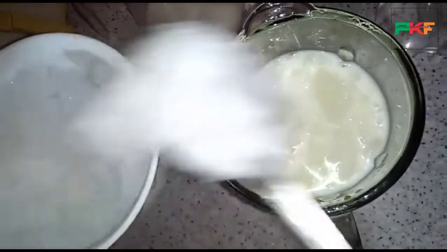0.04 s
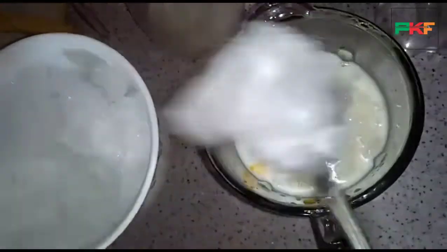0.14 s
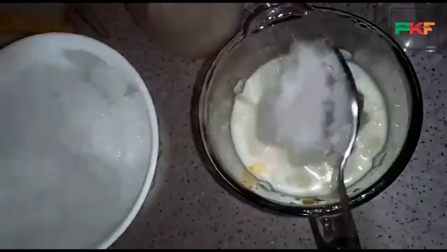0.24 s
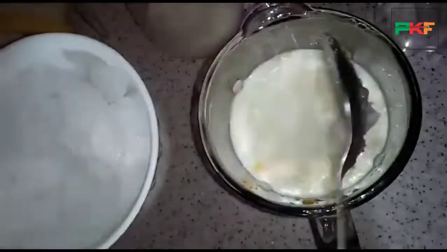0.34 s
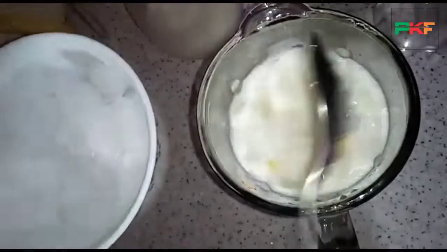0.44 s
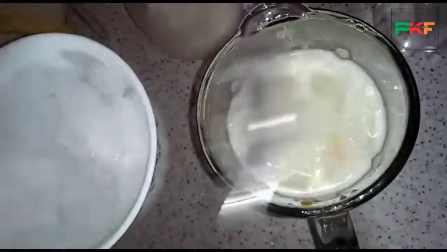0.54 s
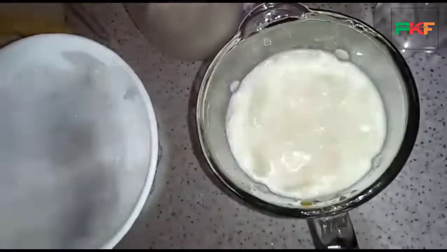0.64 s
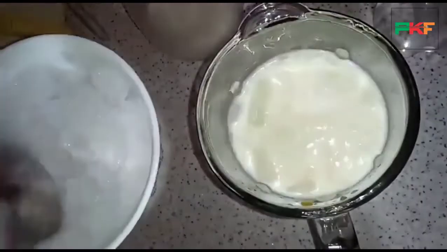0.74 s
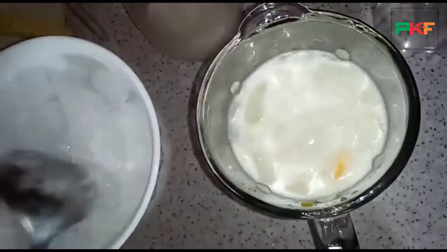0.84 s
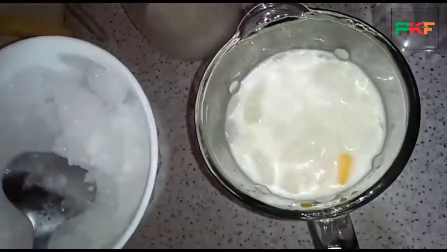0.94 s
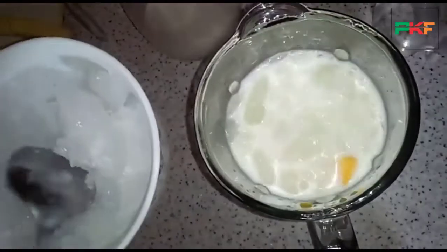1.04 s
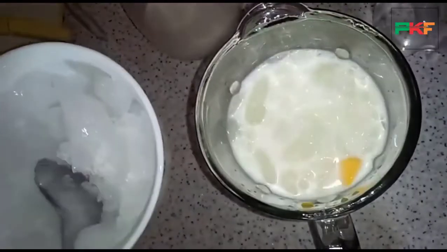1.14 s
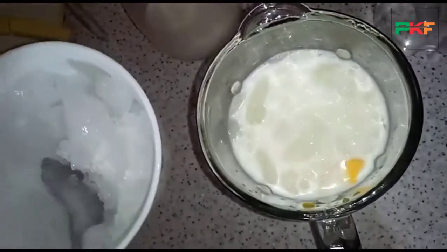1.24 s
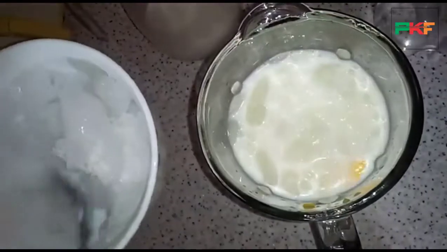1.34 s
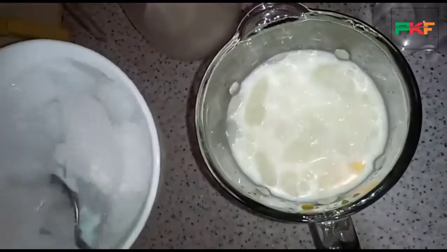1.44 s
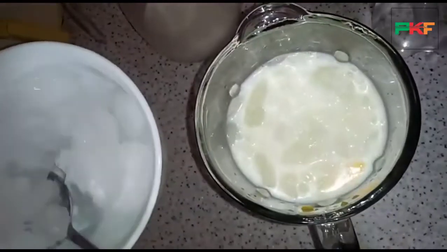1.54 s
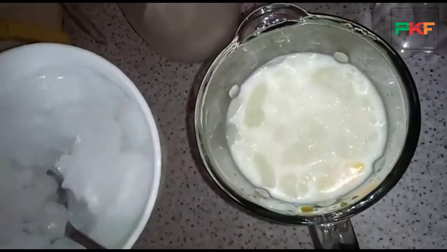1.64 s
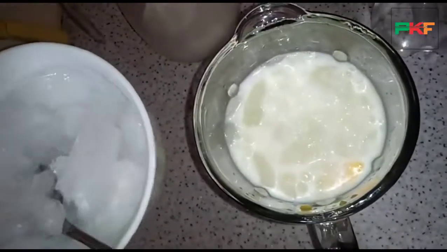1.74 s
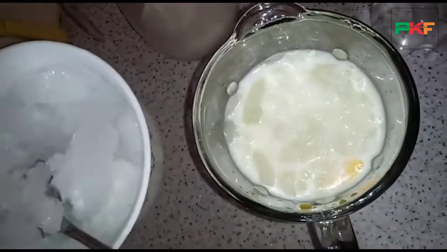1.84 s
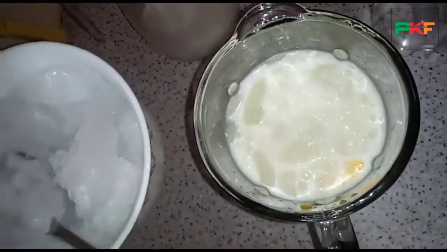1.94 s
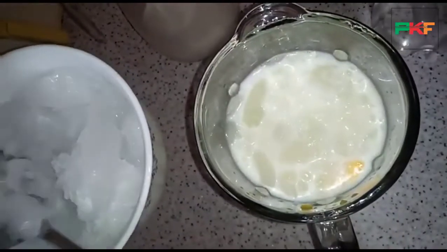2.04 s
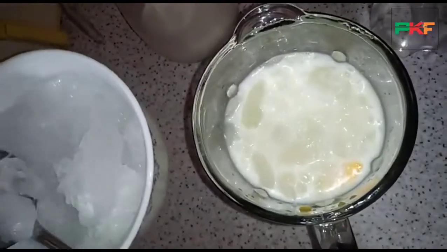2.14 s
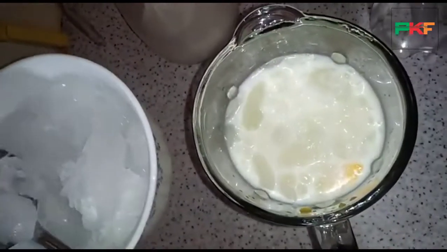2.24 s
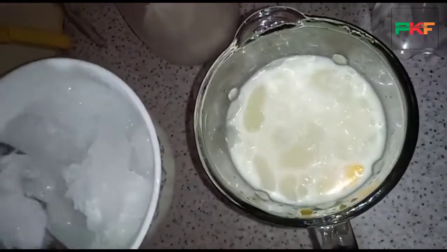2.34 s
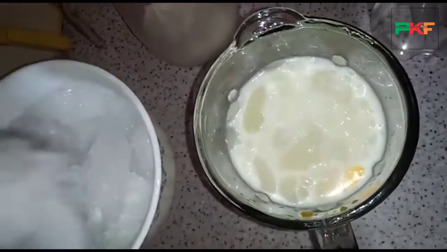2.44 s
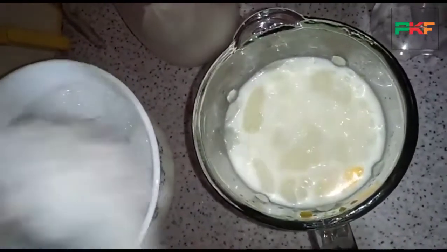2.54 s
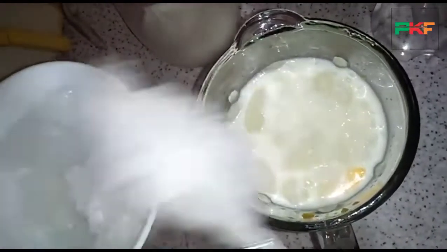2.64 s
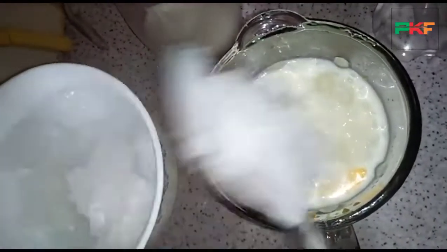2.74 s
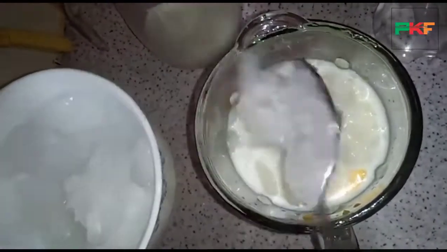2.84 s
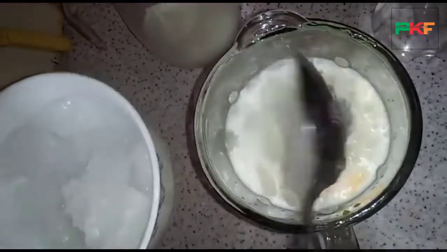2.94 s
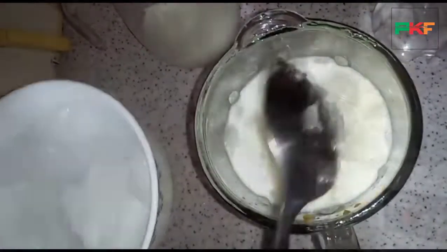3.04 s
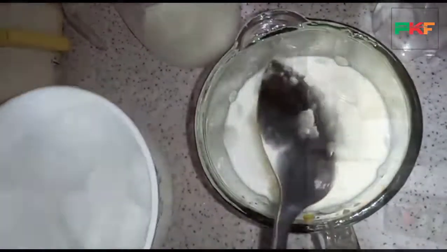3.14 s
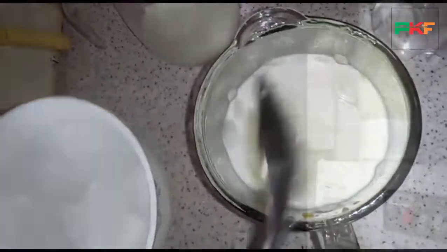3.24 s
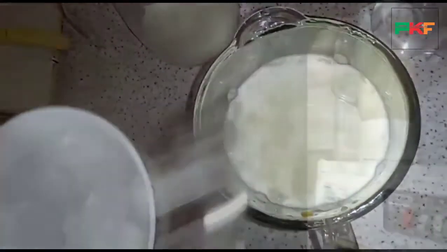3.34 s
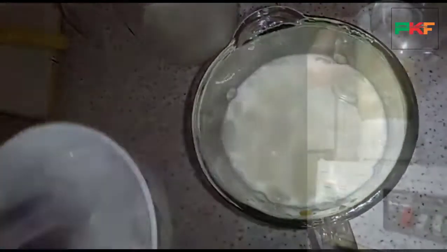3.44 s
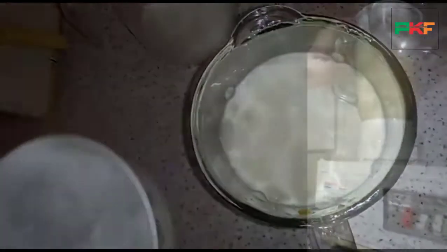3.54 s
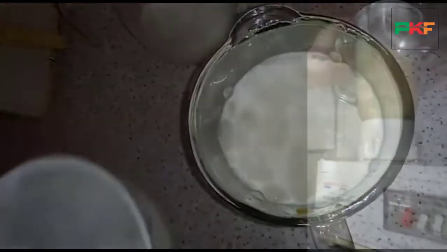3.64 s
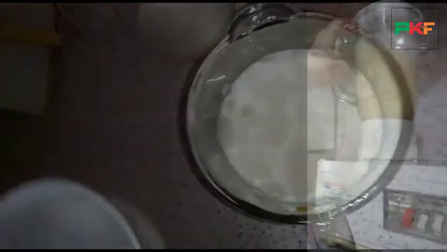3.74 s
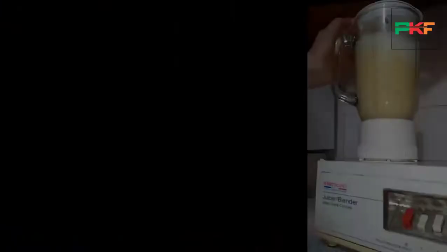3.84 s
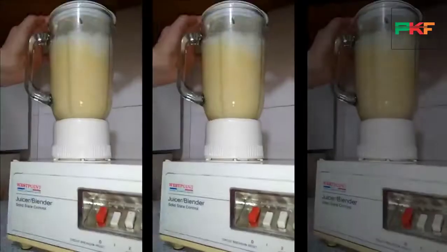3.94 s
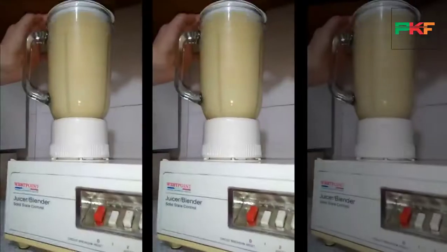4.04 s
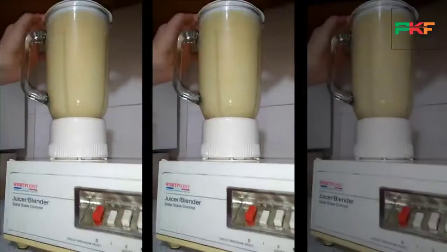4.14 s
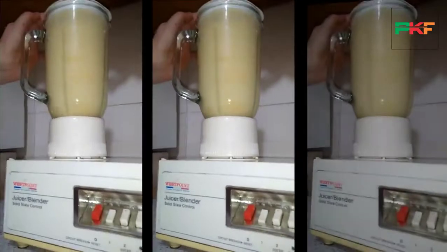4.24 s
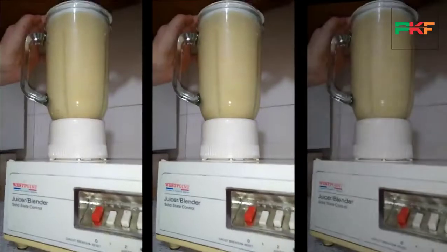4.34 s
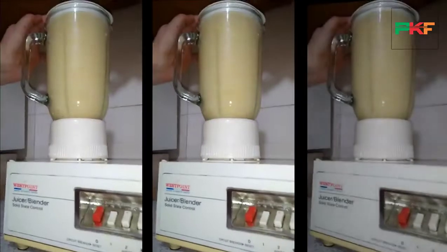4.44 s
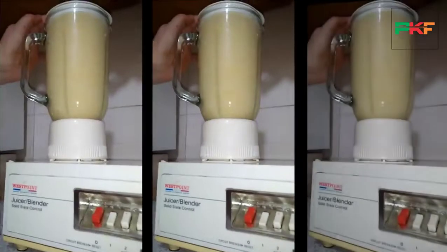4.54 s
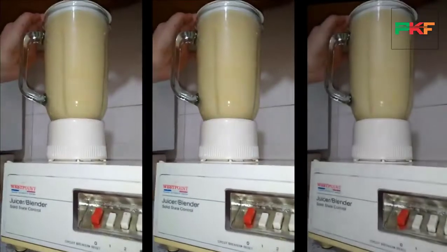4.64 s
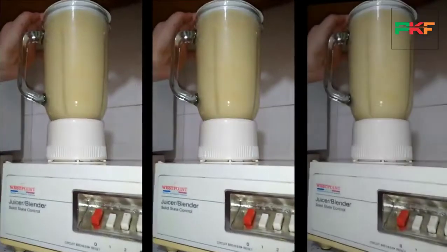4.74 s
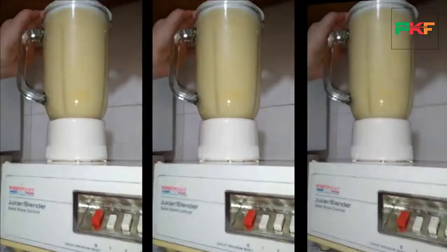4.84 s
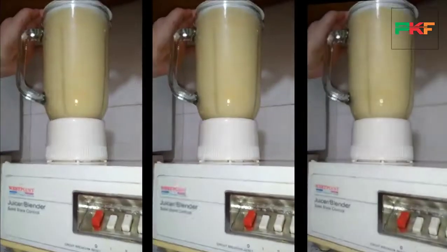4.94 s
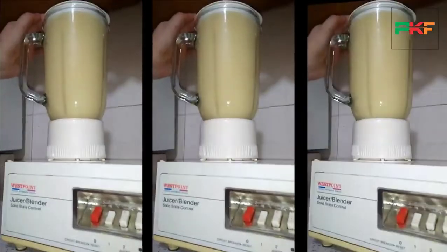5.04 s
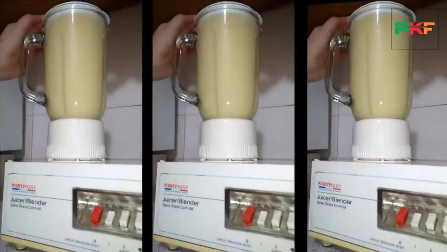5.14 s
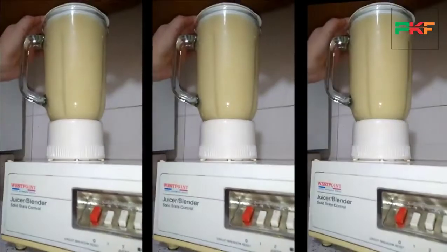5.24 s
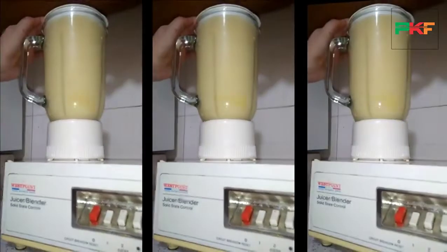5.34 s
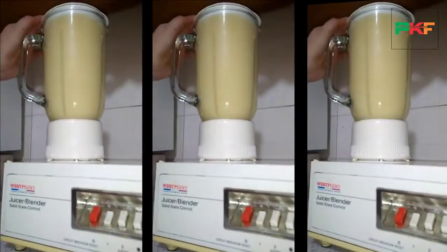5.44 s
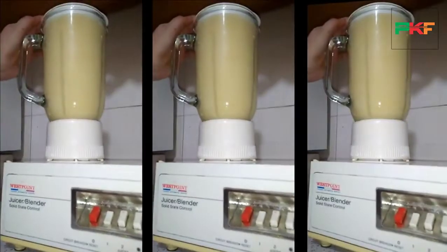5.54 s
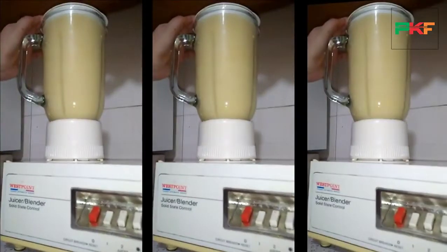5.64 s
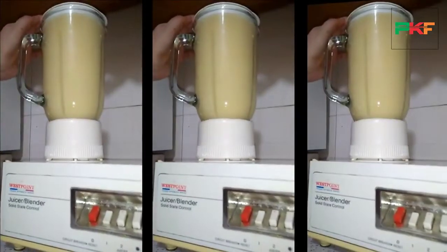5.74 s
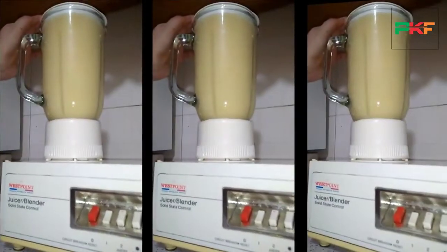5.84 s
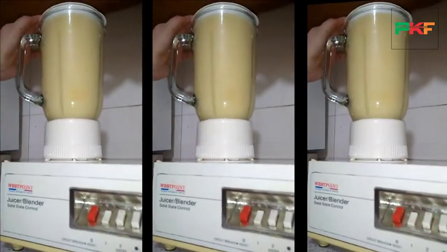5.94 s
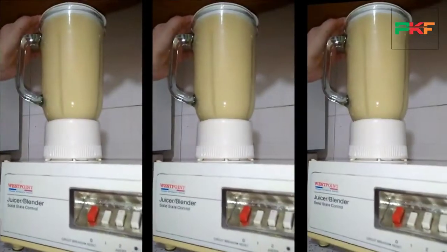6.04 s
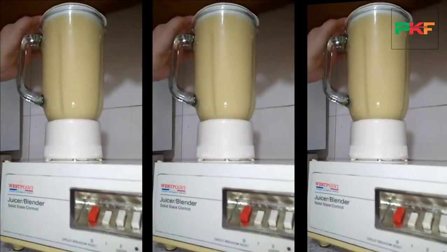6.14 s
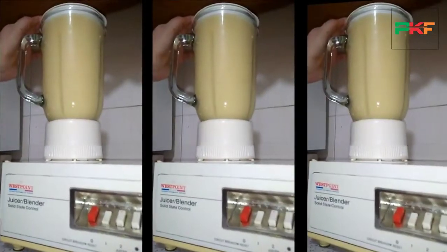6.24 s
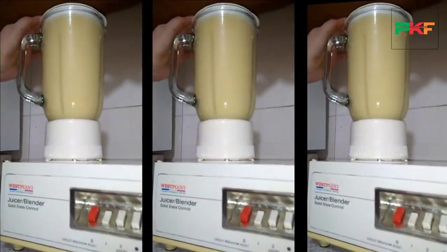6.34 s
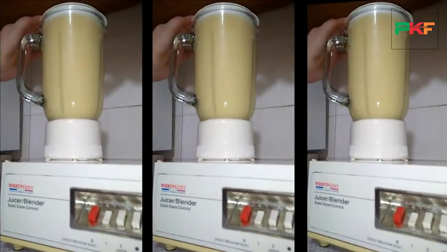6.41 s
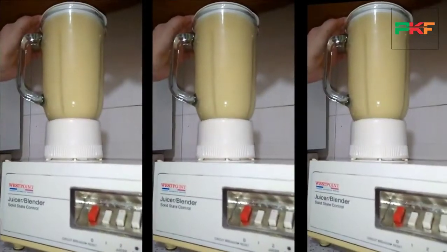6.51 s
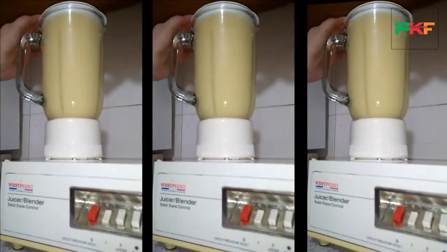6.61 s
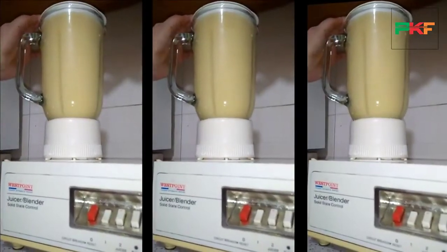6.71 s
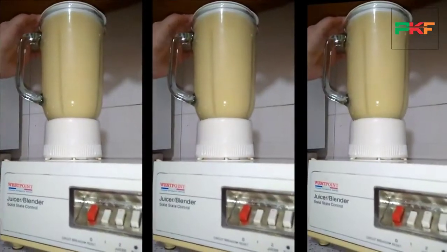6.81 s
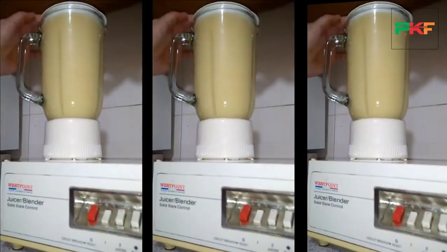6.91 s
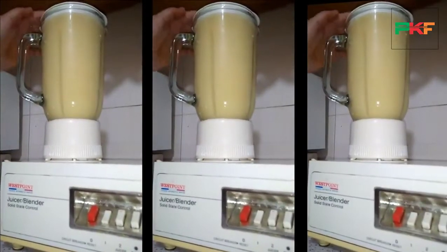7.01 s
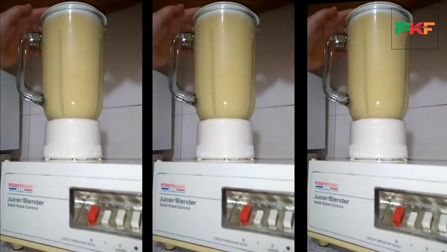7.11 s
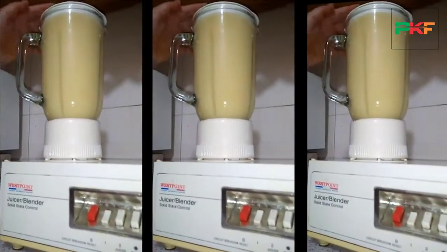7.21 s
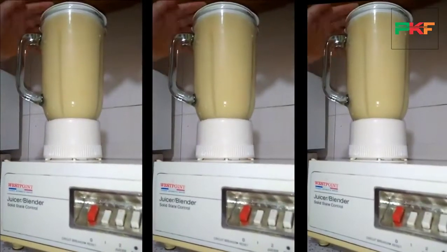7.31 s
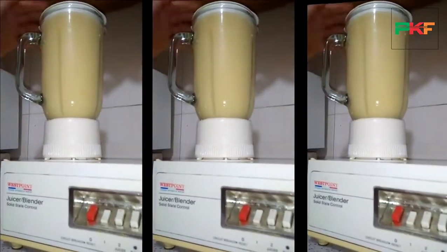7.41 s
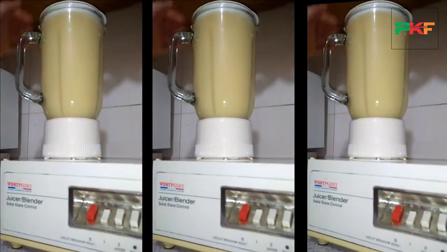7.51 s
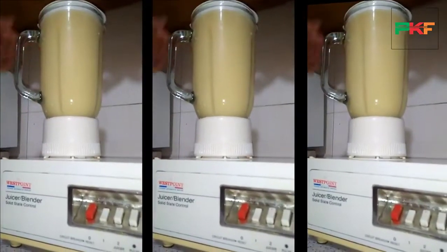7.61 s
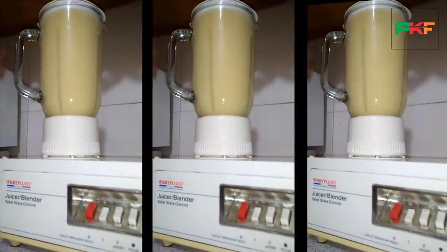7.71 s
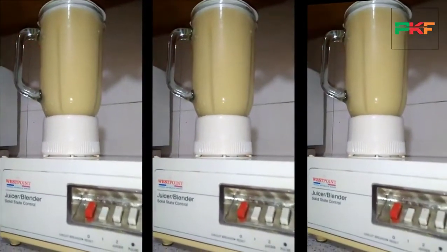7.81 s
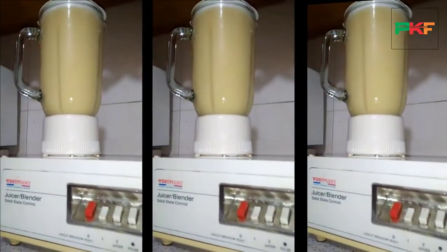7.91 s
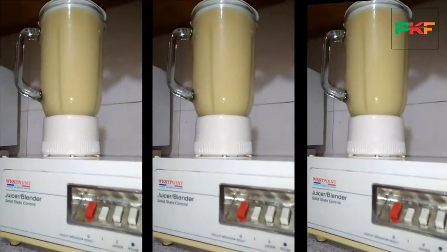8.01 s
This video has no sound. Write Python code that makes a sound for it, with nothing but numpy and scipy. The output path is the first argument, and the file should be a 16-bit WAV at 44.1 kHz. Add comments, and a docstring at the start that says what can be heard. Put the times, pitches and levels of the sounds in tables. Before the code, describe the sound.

Ice patters and cracks into a milk-filled jar, then a metal spoon digs through crushed ice, scraping and clanking hard against the tub. It quiets to small scrapes before a second splashy drop. Silence follows, then a loud blender runs abruptly, its ice knocks thinning as slush churns. Close, slightly overloaded microphone, short kitchen echo.

```python
"""A spoon scrapes and knocks in a tub of crushed ice, and ice tips twice into the milk in a glass jar:
random clicks and single blows set tub, spoon and jar ringing, over a faint rumble, air noise and hiss.
After a short silence a blender is already running: a wandering tone is the motor's hum, and swelling click
noise is ice knocking on the jar and slush surging. Both parts have a short kitchen echo, and the close
microphone flattens the loudest knocks."""
import sys
import numpy as np
from scipy import signal
from scipy.fft import rfft, irfft, next_fast_len
from scipy.io import wavfile

SR = 44100
rng = np.random.default_rng(int(sys.argv[2]) if len(sys.argv) > 2 else 0)


def convert_level_to_amplitude(level_db):
    """Map a level in decibels to its linear amplitude factor."""
    exponent = np.asarray(level_db, float) / 20
    return 10 ** exponent


def transcribe(u):
    """Save the signal u as a 16-bit wav file named by the first command-line argument.

    u: samples, shape (n,) or (channels, n), limited to [-1, 1]; the rate is SR.
    q: integer samples, one column per channel.
    """
    v = np.clip(np.atleast_2d(u).T, -1, 1)
    q = np.round(v * 32767).astype(np.int16)
    wavfile.write(sys.argv[1], SR, q)


N = 355887  # length [samples]
CUT_S, START_S = 3.945, 4.668  # the spoon part ends, the blender part starts

# Levels in the tables are settings for the mix; spectra and resonances give relative levels.
# motor: (time [s], shaft turns [Hz], hum [dB])
MOTOR = [(4.67, 115, -53.5), (5.3, 118, -43.5), (5.9, 123.3, -42), (6.9, 126.2, -41), (8.07, 125.5, -39)]
# large chunks ground by the blades: (centre [s], knock [dB], crunch above knock [dB], reach [s])
# blender() keeps each reach between 0.003 and 0.06 s
CHUNKS = [(4.945, -26, 12, 0.0054), (4.992, -7, -11, .012), (5.037, -17.5, -1, .012), (5.112, -22, 6, .007),
          (5.131, -22.5, 6.5, .012), (5.26, -9, -5.5, 0.011), (5.351, -16.5, 3.5, .015),
          (5.566, -19, -23, .017), (5.631, -14.5, -3.5, 0.01), (5.772, -23.5, 15, 0.0038),
          (5.811, -14, -6.5, 0.0049), (5.884, -9, -2, 0.013), (5.968, -19.5, -16, 0.014),
          (6.068, -14, -12.5, 0.031), (6.162, -13, -7.5, 0.015), (6.244, -14, 6, .004),
          (6.27, -18.5, -4, 0.0089), (6.335, -15.5, 2.5, .008), (6.465, -25.5, -6.5, .02),
          (6.771, -16, 5.5, .007), (7.192, -33, 6, 0.0017), (7.227, -26.5, 18, .01),
          (7.302, -25.5, 10, .01), (7.544, -16, 4, .007)]
# the slush folds over and surges through the blades:
# (centre [s], width [s], surge [dB], crunch above surge [dB], base ring [dB]); surging() scales the width
SURGES = [(4.718, 0.09, -16, -2.5, -24.5), (4.89, 0.17, -8, 8.5, -20), (5.044, .2, 9.5, -1.5, -23.5),
          (5.263, 0.14, 8, -0.5, -43), (5.388, 0.11, 13.5, -0.5, -24), (5.531, 0.066, 1.5, -0.5, -28),
          (5.646, 0.11, 7.5, -12, -33), (5.892, 0.13, 3, -0.5, -27.5), (6.073, 0.21, 4, -5, -20),
          (6.29, 0.23, 3.5, 0, -29.5), (6.46, 0.17, 7, -0.5, -23.5), (6.645, 0.058, 4, 7.5, -24.5),
          (6.764, 0.14, 9, 2.5, -29.5), (6.949, .1, 10.5, 1, -21.5), (7.209, 0.2, 4, 0.5, -19),
          (7.501, 0.26, 2.5, 0, -21), (7.761, .15, 10, -4.5, -21), (7.956, 0.12, 6.5, -7, -24.5),
          (8.06, 0.073, -6, -11.5, -17.5)]
# resonances of jar and housing: (frequency [Hz], width [Hz], level [dB])
HOUSING = [(1050, 33, -2.5), (1361.5, 27, -3), (1598, 200, -6), (1854, 98, -1), (1965, 14, -12),
           (2100, 200, -2.5), (2420, 120, -9.5), (2570, 170, -9)]
# resonances of the glass: (frequency [Hz], width [Hz], level [dB])
GLASS = [(4700, 450, 10), (6420, 240, 20), (8130, 370, 2.5), (8680, 80, -8.5), (8740, 190, -22),
         (11400, 800, -18)]
# hollows in the slush: (frequency [Hz], width [Hz], level [dB])
SLOSH = [(163.4, 14, -4.5), (303, 110, -2.5), (294, 12, -7.5), (451.5, 25, -2), (545.5, 100, -5.5),
         (598, 68, 3)]
# spectrum of the broad noise under the blender's rings: (frequency [Hz], level per Hz [dB])
WASH = [(15, -70), (25, -70.5), (120, 1), (290, -12), (368, -18), (610, -8.5), (840, -9), (1040, 7),
        (1250, -31), (1770, 16.5), (3540, -31.5), (5710, -21.5), (6350, -14.5), (8740, -7.5), (14500, -20)]
# ring of the blender's base: (frequency [Hz], width [Hz], level [dB])
BASE_RING = [(1056, 53.6, -3.5), (1098, 82, -13)]
# spoon knocks in the tub: (time [s], blow [dB], spoon above tub [dB], crack [dB], crush length [s])
# tub() keeps each crush length between 0.004 and 0.3 s
KNOCKS = [(0.903, -59.5, -8, -85, .02), (0.985, -61, -9, -80, .02), (1.134, -58, -5, -57, 0.026),
          (1.214, -42.5, -5, -53.5, .05), (1.289, -46, -30, -79.5, 0.42), (1.342, -32.5, -17, -28, 0.021),
          (1.376, -35, -23, -54, 0.026), (1.384, -6, -51, -23, 0.07), (1.551, -27, -35, -67, 0.034),
          (1.558, -24.5, -18, -25.5, 0.026), (1.593, -20, 30, -22, 0.039), (1.63, -6, 49, -16, 0.071),
          (1.64, -16.5, -2, -21, 0.033), (1.837, -24, 19, -38, 0.051), (2.09, -50, -32, -84, 0.037),
          (2.288, -51, -4, -50, 0.16), (2.345, -48, 6, -49, 0.082), (2.522, -54.5, -2, -48, 0.1),
          (2.572, -63, -10.5, -68, 0.05), (2.76, -64, -16, -64.5, 0.048)]
# strokes of the spoon through the ice:
# (start [s], length [s], scrape [dB], crystal hiss above scrape [dB])
STROKES = [(.96, .08, -65, 1.5), (1.114, 0.21, -44, -13), (1.295, 0.31, -27, -12.5), (1.55, 0.51, -31, -12),
           (1.952, 0.047, -61, 3), (2.074, 0.072, -46.5, -13.5), (2.15, 0.078, -47.5, -2.5),
           (2.329, 0.056, -43, -7), (2.505, 0.064, -54, -9.5), (2.6, .1, -74.5, -14)]
# ringing tones of the tub: (frequency [Hz], level [dB], time to fade by 60 dB [s])
TUB = [(507, -19, 0.12), (900, -4, .04), (994, 6.5, 0.03), (1200, -8, 0.076), (1504, -14, 0.14),
       (3160, -14, 0.069), (3270, -6.5, 0.037), (4840, -12, 0.029), (5430, -3, 0.06), (10100, -19, .06)]
# ringing tones of the spoon: (frequency [Hz], level [dB], time to fade by 60 dB [s])
SPOON = [(1540, -3.5, .12), (2028, 5.5, 0.14), (2098, 3.5, 0.076), (2430, -9, 0.14), (2550, -14, 0.031),
         (3520, -18, 0.44), (3680, -6, 0.17), (5480, -17.5, 0.36), (5590, -12, .15), (6358, -13.5, 0.073),
         (9700, -23.5, .2)]
# ice sliding off the spoon into the jar: (start [s], length [s], jar [dB], fizz above jar [dB])
SLIDES = [(0.443, .04, -71.5, 16), (0.481, 0.043, -36.5, 3.5), (0.537, 0.043, -29, 3), (.61, 0.11, -54, 10),
          (3.09, 0.036, -75, 15.5), (3.13, 0.07, -24.5, -1.5), (3.233, 0.029, -32, 3),
          (3.29, 0.06, -66, 12), (3.422, .03, -66, -15), (3.568, 0.031, -55.5, 8)]
# lumps landing in the jar: (time [s], note [Hz], note [dB], crack [dB], plop [dB])
LUMPS = [(0.488, 900, -27, -51, -48), (0.4946, 948, -8.5, -11, -27.5), (0.518, 1140, -20, -39, -30),
         (0.533, 1140, -25, -29, -61), (0.607, 1200, -55, -33, -73), (0.669, 1200, -31.5, -26, -70),
         (0.727, 1200, -39.5, -51, -53), (3.138, 1200, -28, -23.5, -37.5), (3.1463, 1376, -11, -14.5, -45),
         (3.235, 1140, -24, -28.5, -49.5), (3.238, 965, -21, -31.5, -53), (3.255, 1200, -38.5, -31, -57),
         (3.2609, 1050, -25.5, -40, -52), (3.34, 2320, -40.5, -57.5, -70), (3.424, 1260, -44.5, -67.5, -68)]
# resonances of the air in the jar: (frequency [Hz], width [Hz], level [dB])
JAR_AIR = [(920, 330, -7), (1240, 270, -3), (1835, 490, -14), (2270, 83, -1)]
# spectrum of the fizzing ice: (frequency [Hz], level per Hz [dB])
FIZZ = [(1650, -16), (2800, -9), (3590, -12.5), (4000, -6), (7290, -1.5), (9400, -3), (13400, -7.5),
        (14500, -0.5)]
# a faint thin tone flickers near the jar: (start [s], length [s], level [dB])
SETTLES = [(0.429, .72, -67.5), (3.56, .1, -73)]
# the hand shifts the tub, dull bumps: (centre [s], reach [s], level [dB])
BUMPS = [(.2, 0.15, -59), (0.548, 0.13, -53), (0.794, 0.08, -64), (1.062, 0.14, -55), (1.3, 0.19, -66),
         (1.68, .3, -59.5), (2.619, 0.11, -58.5), (2.79, .06, -60), (3.24, .2, -60.5), (3.5, .12, -65)]
# spectrum of the low rumble: (frequency [Hz], level per Hz [dB])
RUMBLE = [(15, -32.5), (25, -10), (43, 0.5), (102, 4), (124, -4.5), (250, -24.5), (320, -47), (550, -120)]
# spectrum of the air noise: (frequency [Hz], level per Hz [dB])
AIR = [(120, -39), (200, -8.5), (437, -4), (670, -12.5), (732, -3), (922, -7), (1780, -13), (2500, -20),
       (14000, -48)]

# Blender base settings, before the surge factor
KNOCK_DB, CRUNCH_DB, SLOSH_DB = -20, -26, -37
RING_DB = -31  # base ring between surges
KNOCK_FADE_DB_PER_S, CRUNCH_FADE_DB_PER_S = 4.5, 1.04  # the ice gets finer
SLOSH_FOLLOWS = 0.88  # power of the surge factor that the slosh takes
GURGLE, GURGLES_PER_S = .025, 6  # the hollows in the slush change size: share of pitch, pace
STROKE_ATTACK_S, STROKE_SAG_DB_PER_S, STROKE_RELEASE_DB_PER_S = 0.021, 29.5, 202
TUB_RUB_DB, SPOON_RUB_DB, CRUSH_DB = 22, 22.5, 1  # grit fed to tub, spoon and air, above the blow
NICKS_PER_S, NICK_DB = 180, 0.5  # the spoon's edge catches on lumps
RING_WAVER = .007  # ice against the walls unsettles the pitch of the rings: share of pitch
SLIDE_ATTACK_S, SLIDE_SAG_DB_PER_S = .003, 90
JAR_RELEASE_DB_PER_S, FIZZ_RELEASE_DB_PER_S = 350, 450
SETTLE_HZ, SETTLE_WIDTH_HZ = 2250, 55
RUMBLE_DB, AIR_DB, HISS_DB = -75, -69.5, -79  # still kitchen; the hiss is the microphone's
AIR_FOLLOWS = 0.083  # share of a bump's swing in dB that the air noise takes


def blender():
    """Ice bits rattle on blades and glass in quick clumps; each surge and large chunk swells the same rattle."""
    surge_db, bright_db = np.transpose(SURGES)[2:4]
    chunk_s, chunk_db, chunk_bright_db, reach = np.transpose(CHUNKS)
    reach = np.clip(reach, .003, .06)
    running_s = np.maximum(np.arange(N) / SR - START_S, 0)

    clumps = convert_level_to_amplitude(1.2 * drift(20) + 1.5 * drift(60))
    rattle = grains(5000, 3.0) * clumps
    spray = grains(8000, 3.0) * clumps * convert_level_to_amplitude(1.0 * drift(20))
    churn = grains(3000, 2.5)

    # Each layer is a ringing part plus a broad noisy part
    housing = resonances(rattle, HOUSING, flutter_db=2.5)
    knock = rms_one(housing) + 0.55 * rms_one(band(coloured(rattle, WASH), 800, 5100))
    glass = resonances(spray, GLASS, flutter_db=2.0)
    crunch = 0.57 * rms_one(glass) + 0.73 * rms_one(band(coloured(spray, WASH), 3000, 15000))
    hollow = wavering(resonances(churn, SLOSH, flutter_db=3.5), GURGLE, GURGLES_PER_S)
    slosh = rms_one(hollow) + 0.29 * rms_one(band(coloured(churn, WASH), 43, 900))

    surge = 1.5 + surging(surge_db)
    bright_surge = 1.5 + surging(surge_db + bright_db)
    knock_level = convert_level_to_amplitude(KNOCK_DB - KNOCK_FADE_DB_PER_S * running_s) * surge
    knock_level += swells(chunk_s, chunk_db, reach)
    crunch_level = convert_level_to_amplitude(CRUNCH_DB - CRUNCH_FADE_DB_PER_S * running_s) * bright_surge
    crunch_level += swells(chunk_s, chunk_db + chunk_bright_db, reach)
    slosh_level = convert_level_to_amplitude(SLOSH_DB) * surge ** SLOSH_FOLLOWS
    return knock * knock_level + crunch * crunch_level + slosh * slosh_level


def motor():
    """The unbalanced shaft shakes the base once a turn; the coupling chatters into the ring of the base."""
    t = np.arange(N) / SR
    time_s, turns_hz, level_db = np.transpose(MOTOR)
    shaft_hz = np.interp(t, time_s, turns_hz) * (1 + 0.006 * drift(6.1))
    hum_db = np.interp(t, time_s, level_db) + 1.1 * drift(4.0)
    turn = 2 * np.pi * np.cumsum(shaft_hz) / SR
    hum = np.sqrt(2) * convert_level_to_amplitude(hum_db) * np.sin(turn)

    chatter = grains(2000, 3.5)
    ring_level = convert_level_to_amplitude(RING_DB) + surging(np.transpose(SURGES)[-1])
    ring = ring_level * rms_one(resonances(chatter, BASE_RING))
    counter = convert_level_to_amplitude(-52 + 2.4 * drift(10)) * rms_one(band(rng.standard_normal(N), 35, 200))
    return hum + ring + counter


def tub():
    """Dragging and knocking feed clicks to tub and spoon; a knock is a short crush of ice, so rings are rough."""
    start, length, scrape_db, hiss_db = np.transpose(STROKES)
    shape = STROKE_ATTACK_S, STROKE_SAG_DB_PER_S, STROKE_RELEASE_DB_PER_S
    knock_s, blow_db, lean_db, crack_db, crush_s = np.transpose(KNOCKS)
    crush_s = np.clip(crush_s, .004, .3)
    # Share the power of each blow between tub and spoon
    tub_db = blow_db - 10 * np.log10(1 + convert_level_to_amplitude(2 * lean_db))
    spoon_db = tub_db + lean_db

    rub = grains(6000, 3.0)
    drag = strokes(start, length, scrape_db, *shape) * convert_level_to_amplitude(4.0 * drift(20))
    hiss = strokes(start, length, scrape_db + hiss_db, *shape) * convert_level_to_amplitude(1.5 * drift(25))
    nicks = convert_level_to_amplitude(NICK_DB) * drag * band(grains(NICKS_PER_S, 2.0), 600, 2400)

    tub_rub = rub * (1.1 * drag + bursts(knock_s, tub_db + TUB_RUB_DB, crush_s))
    spoon_rub = rub * (1.4 * drag + bursts(knock_s, spoon_db + SPOON_RUB_DB, crush_s))
    tub_ring = resonances(nicks + tub_rub, as_peaks(TUB))
    spoon_ring = resonances(spoon_rub, as_peaks(SPOON))
    rings = wavering(tub_ring + spoon_ring, RING_WAVER, 120)

    air_rub = rub * (0.6 * drag + bursts(knock_s, blow_db + CRUSH_DB, 2.2 * crush_s))
    crush = band(1.3 * nicks + air_rub, 770, 2800)
    crack_level = hiss + bursts(knock_s, crack_db, 1.5 * crush_s)
    crack = crack_level * rms_one(band(grains(7700, 2.9), 3500, 21000))

    tub_touch = struck(knock_s, tub_db, TUB, 1, rough_db=5)
    spoon_touch = wavering(struck(knock_s, spoon_db, SPOON, 1, rough_db=6), .004, 150)
    touch = convert_level_to_amplitude(-3) * band(tub_touch + spoon_touch, 490, 15000)
    return touch + rings + crush + crack


def jar():
    """Ice patters into the air of the jar and fizzes; each lump sounds a note, cracks and plops into the milk."""
    start, length, jar_db, fizz_db = np.transpose(SLIDES)
    shape = SLIDE_ATTACK_S, SLIDE_SAG_DB_PER_S
    sliding = strokes(start, length, jar_db, *shape, JAR_RELEASE_DB_PER_S)
    fizzing = strokes(start, length, jar_db + fizz_db, *shape, FIZZ_RELEASE_DB_PER_S)

    jar_ring = wavering(resonances(grains(1200, 3.5), JAR_AIR, flutter_db=2.5), .03, 30)
    patter = rms_one(band(jar_ring, 820, 6000))
    patter = signal.sosfilt(signal.butter(4, 780, "high", fs=SR, output="sos"), patter)
    fizz = coloured(grains(6000, 2.5) * convert_level_to_amplitude(2.5 * drift(40)), FIZZ)

    lingering = strokes(*np.transpose(SETTLES), 0.036, 3.4, 300)
    thin_tone = rms_one(resonances(grains(400, 3.0), [(SETTLE_HZ, SETTLE_WIDTH_HZ, 0)]))

    lump_s, _, _, crack_db, plop_db = np.transpose(LUMPS)
    notes = np.zeros(N)
    for s, hz, note_db, *_ in LUMPS:
        notes += struck([s], note_db, [(hz, 0, .03), (1.51 * hz, -3, .012)], 0)
    plop = struck(lump_s, plop_db, [(100, 0, 0.093)], 0)
    cracks = bursts(lump_s, crack_db, .02)
    return sliding * patter + lingering * thin_tone + (fizzing + cracks) * fizz + band(notes, 870, 3700) + plop


def kitchen_echo(x, t60, dull_hz):
    """Sound bounces between surfaces: ten feedback delays, duller on every round."""
    size = next_fast_len(N + SR)
    w = 2 * np.pi * np.arange(size // 2 + 1) / size  # radians per sample
    wall = 1 / (1 + 1j * w * SR / (2 * np.pi * dull_hz))
    echoes = 0
    for lag in rng.uniform(.008, .03, 10) * SR:
        one_round = convert_level_to_amplitude(-60 * lag / SR / t60) * wall * np.exp(-1j * w * lag)
        echoes = echoes + one_round / (1 - one_round)  # all rounds added up
    return irfft(rfft(x, size) * echoes, size)[:N] / 3


def quiet():
    """Lumpy rumble, raised by each bump, with a faint wide air noise and hiss, all from random noise."""
    centre, reach, bump_db = np.transpose(BUMPS)
    shake = convert_level_to_amplitude(RUMBLE_DB) + swells(centre, bump_db, reach)
    rumble = coloured(rng.standard_normal(N), RUMBLE) * shake * convert_level_to_amplitude(2.5 * drift(8.9))
    hiss = convert_level_to_amplitude(HISS_DB) * rms_one(band(rng.standard_normal(N), 2600, 15000))
    air_level = convert_level_to_amplitude(AIR_DB) * (shake / convert_level_to_amplitude(RUMBLE_DB)) ** AIR_FOLLOWS
    return rumble + hiss + coloured(rng.standard_normal(N), AIR) * air_level


def rms_one(x):
    """Scales x to an average (rms) level of 1."""
    return x / np.sqrt(np.mean(x ** 2) + 1e-20)


def drift(rate_hz):
    """Slow random wandering around zero, rms 1: noise smoothed by two equal low-pass steps."""
    r = np.exp(-2 * np.pi * rate_hz / SR)
    noise = rng.standard_normal(N + SR)
    return rms_one(signal.lfilter([1], [1, -2 * r, r * r], noise)[SR:])  # skip the filter's first second


def grains(per_s, spread_db):
    """Random clicks, a few much larger than the rest; rms 1."""
    sizes = convert_level_to_amplitude(spread_db * np.minimum(rng.exponential(1, N), 5)) * rng.choice([-1, 1], N)
    return rms_one(sizes * (rng.random(N) < per_s / SR))


def coloured(x, spectrum):
    """Weights the frequencies of x by a spectrum; rms 1."""
    size = next_fast_len(N)
    hz, level_db = np.transpose(spectrum)
    log_hz = np.log(np.arange(size // 2 + 1) * SR / size + 1)
    gain = convert_level_to_amplitude(np.interp(log_hz, np.log(hz), level_db))
    return rms_one(irfft(rfft(x, size) * gain, size)[:N])


def band(x, low_hz, high_hz):
    """Keeps the frequencies between two limits."""
    return signal.sosfilt(signal.butter(3, [low_hz, high_hz], "band", fs=SR, output="sos"), x)


def resonances(x, peaks, flutter_db=0):
    """Side-by-side resonances with alternating signs; flutter makes each swell and fade on its own."""
    out = 0
    for k, (hz, width_hz, level_db) in enumerate(peaks):
        r = np.exp(-np.pi * width_hz / SR)
        top = (-1) ** k * convert_level_to_amplitude(level_db) * (1 - r * r) / 2
        drive = x * convert_level_to_amplitude(flutter_db * drift(12.0)) if flutter_db else x
        poles = [1, -2 * r * np.cos(2 * np.pi * hz / SR), r * r]
        out = out + signal.lfilter([top, 0, -top], poles, drive + 1e-18)
    return out


def as_peaks(modes):
    """A tone that fades by 60 dB in t60 seconds is a resonance this wide."""
    return [(hz, np.log(1000) / np.pi / t60, db) for hz, db, t60 in modes]


def struck(times, levels_db, modes, vary_db, rough_db=0):
    """Each blow strikes every tone with its own strength; loose ice touching the walls can make rings stutter."""
    at, out = (np.asarray(times) * SR).astype(int), np.zeros(N)
    chance = rng.standard_normal((len(at), len(modes)))
    for k, (hz, level_db, t60) in enumerate(modes):
        clicks = np.full(N, 1e-18)
        clicks[at] = convert_level_to_amplitude(levels_db + level_db + vary_db * chance[:, k])
        r, w = convert_level_to_amplitude(-60 / (t60 * SR)), 2 * np.pi * hz / SR
        ring = signal.lfilter([0, np.sin(w)], [1, -2 * r * np.cos(w), r * r], clicks)
        out += ring * convert_level_to_amplitude(rough_db * drift(120)) if rough_db else ring
    return out


def bursts(times, levels_db, t60s):
    """Envelope that jumps at each time and dies away by 60 dB."""
    out = np.zeros(N)
    for s, level_db, t60 in np.broadcast(times, levels_db, t60s):
        first = int(s * SR)
        age = np.arange(min(int(t60 * SR), N - first)) / SR
        out[first:first + len(age)] += convert_level_to_amplitude(level_db - 60 * age / t60)
    return out


def swells(times, levels_db, reaches, power=2):
    """Humps that fall to exp(-2) one reach from their centre; a higher power flattens the top."""
    t, out = np.arange(N) / SR, np.zeros(N)
    for s, level_db, reach in np.broadcast(times, levels_db, reaches):
        near = slice(max(int((s - 2 * reach) * SR), 0), int((s + 2 * reach) * SR))
        out[near] += convert_level_to_amplitude(level_db) * np.exp(-2 * np.abs((t[near] - s) / reach) ** power)
    return out


def surging(levels_db):
    """Flat-topped humps, one a surge."""
    centre, width = np.transpose(SURGES)[:2]
    return swells(centre, levels_db, width / 2 * 1.3, power=3)


def strokes(starts, lengths, levels_db, attack_s, sag_db_per_s, release_db_per_s):
    """Envelope that rises, sags while it is held and then falls away."""
    out = np.zeros(N)
    for s, length, level_db in zip(starts, lengths, levels_db):
        near = out[int(s * SR):int(s * SR) + SR]  # a view, so adding to it fills out
        age = np.arange(len(near)) / SR
        fall_db = sag_db_per_s * np.minimum(age, length) + release_db_per_s * np.maximum(age - length, 0)
        near += np.minimum(age / attack_s, 1) ** 2 * convert_level_to_amplitude(level_db - fall_db)
    return out


def wavering(x, share, per_s):
    """Reads x at an uneven speed, so its pitches wander."""
    return np.interp(np.cumsum(1 + share * drift(per_s)) % (N - 1), np.arange(N), x)


def scene():
    """The spoon, tub and jar, a short silence, then the running blender."""
    t = np.arange(N) / SR
    near = tub() + jar()
    first = near + convert_level_to_amplitude(-15.5) * kitchen_echo(near, 0.41, 7500) + quiet()
    first *= np.clip((CUT_S - t) / .006, 0, 1)
    machine = blender() + motor()
    second = machine + convert_level_to_amplitude(-12) * kitchen_echo(machine, 0.32, 6100)
    second *= np.clip((t - START_S) / 0.0023, 0, 1)
    return (first + second)[None]


def band_limit(x):
    """A steep low-pass at the top of the band."""
    return signal.sosfilt(signal.butter(12, 15590, fs=SR, output="sos"), x)


def record(dry):
    """The close microphone overloads: the loudest peaks are flattened, and the top above 14450 Hz is cut."""
    flattened = 1.15 * np.tanh(dry / 1.15)
    cut = signal.sosfilt(signal.cheby2(16, 40, 14450, fs=SR, output="sos"), flattened)
    return band_limit(np.clip(cut, -1, 1))


dry = scene()
out = record(dry)
transcribe(out)
```